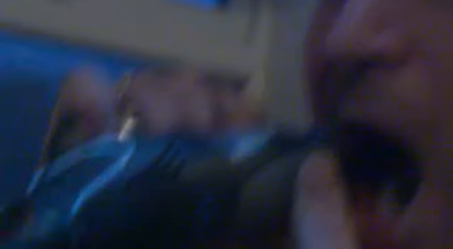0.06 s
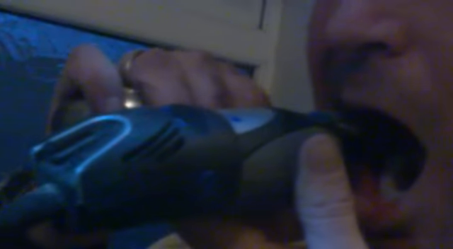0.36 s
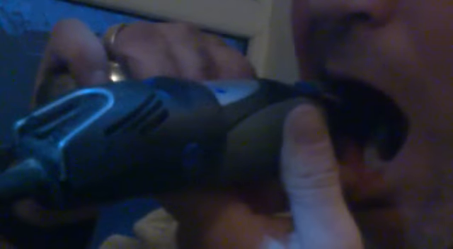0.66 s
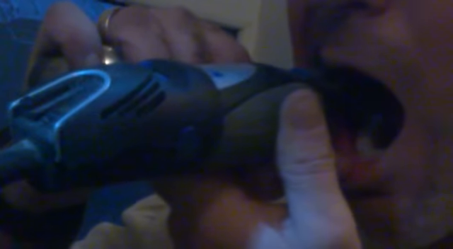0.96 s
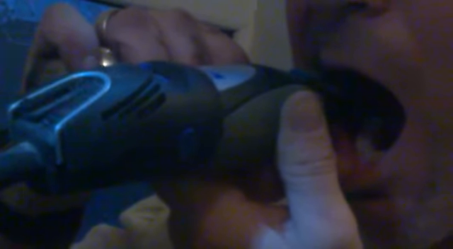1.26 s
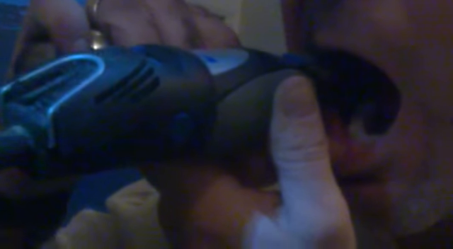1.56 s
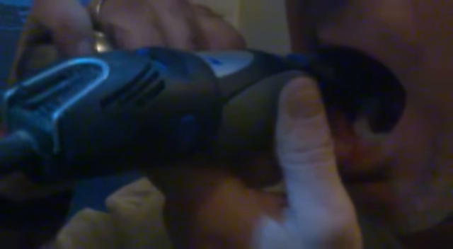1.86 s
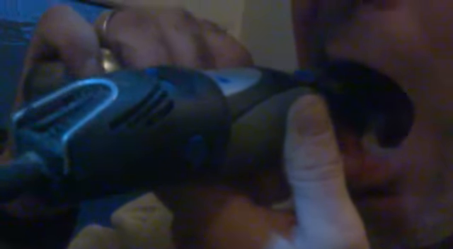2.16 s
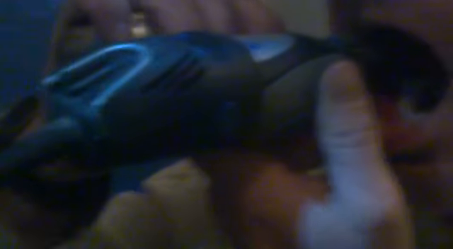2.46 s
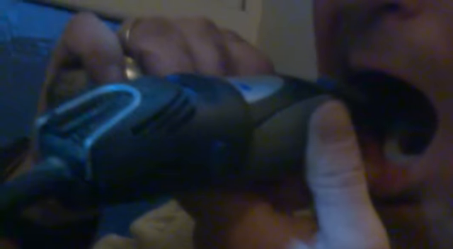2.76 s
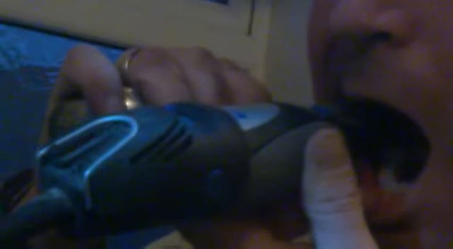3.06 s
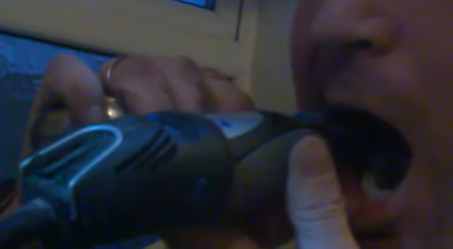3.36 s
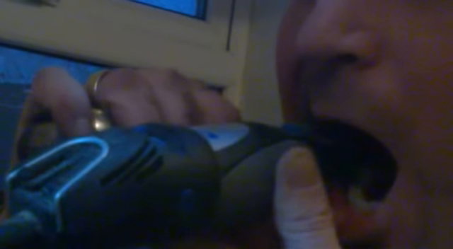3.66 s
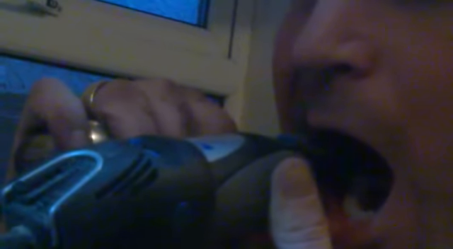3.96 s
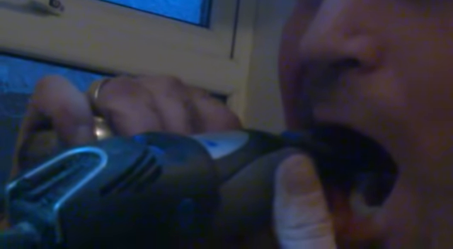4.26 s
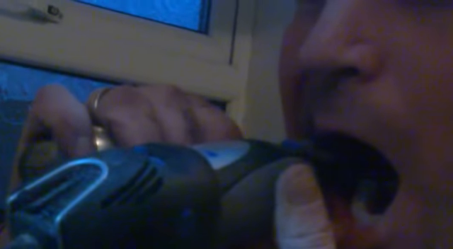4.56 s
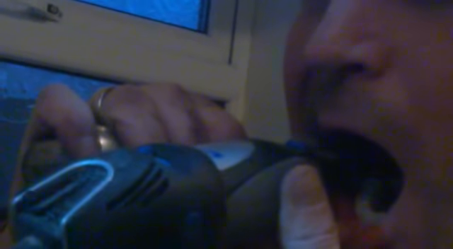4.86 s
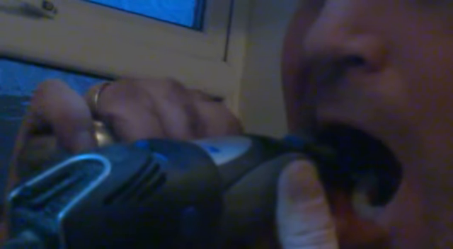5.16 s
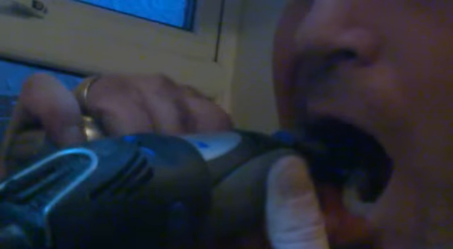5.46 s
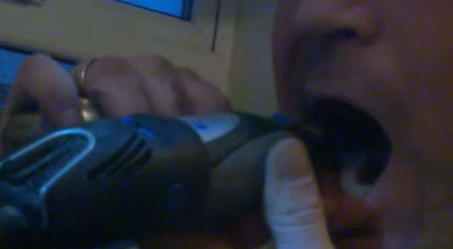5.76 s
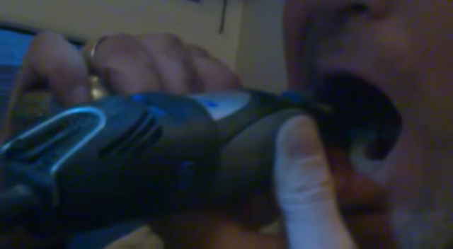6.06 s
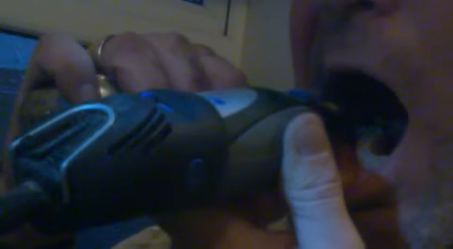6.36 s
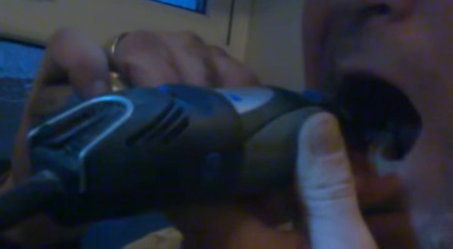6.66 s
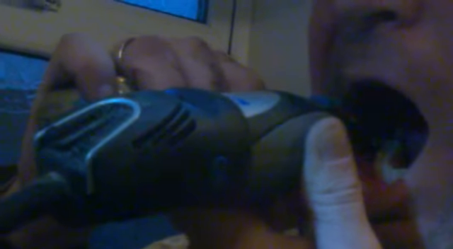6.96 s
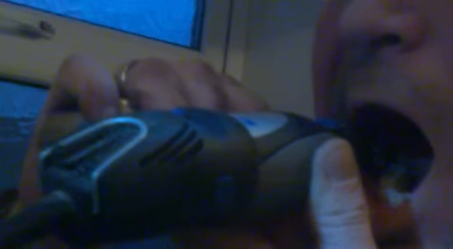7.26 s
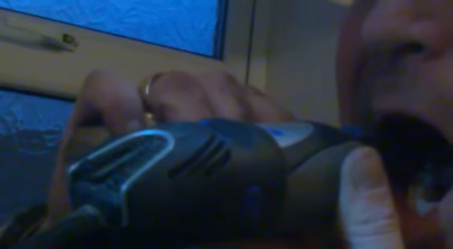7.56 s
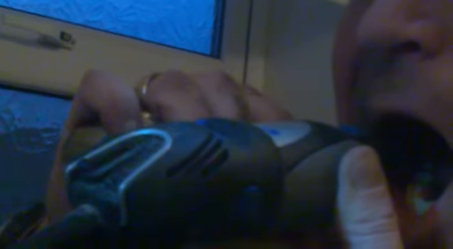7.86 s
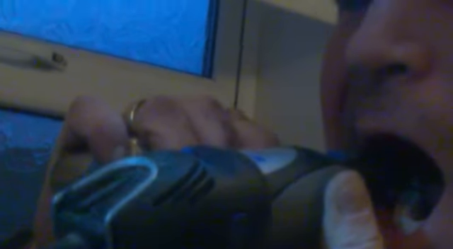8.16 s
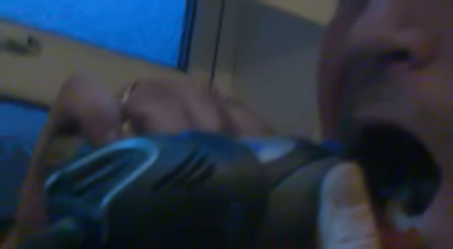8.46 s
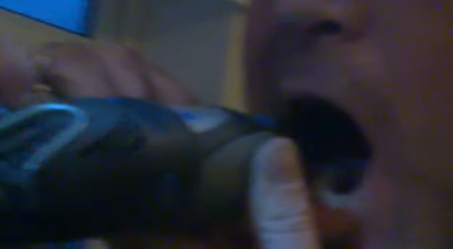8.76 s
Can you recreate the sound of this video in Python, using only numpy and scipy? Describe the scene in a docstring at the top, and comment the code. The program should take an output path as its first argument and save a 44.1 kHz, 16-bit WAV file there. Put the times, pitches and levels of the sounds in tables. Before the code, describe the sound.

Shrill, buzzing scrapes of a spinning burr on a tooth start and stop over a small motor's hum and whine.

```python
"""A mains rotary tool is already running in a small room: hum, commutator whine and cooling air.
In the first second its springy, off-centre burr taps a man's tooth, bouncing and scraping the enamel on
every second turn: a rasping buzz that rings in the burr and the open mouth. Longer stretches follow; in
the gaps only the motor is left. The burr catches hard just after 4 s, goes back to short dabs around 6 s,
then is pushed in again near 8 s, the motor's pitch having crept up all the while."""
import sys
import numpy as np
from scipy import signal
from scipy.fft import rfft, irfft
from scipy.io import wavfile
from scipy.ndimage import uniform_filter1d, map_coordinates

SR = 44100
rng = np.random.default_rng(int(sys.argv[2]) if len(sys.argv) > 2 else 0)


def put_to_file(sound):
    """Save the sound as 16-bit audio at rate SR, in the file named by the first command-line argument."""
    columns = np.atleast_2d(sound).T  # one column per channel
    safe = np.clip(columns, -1, 1)
    whole_steps = np.round(safe * 32767)
    wavfile.write(sys.argv[1], SR, whole_steps.astype(np.int16))


N = 393372
TIME = np.arange(N) / SR


def from_db(db):
    """Decibels to gain."""
    return 10 ** (np.asarray(db) / 20)


def rms_one(x):
    """Scale to unit power."""
    return x / np.sqrt(np.mean(x ** 2) + 1e-20)


def curve(rows):
    """A row-by-row automation curve at every sample."""
    return np.interp(TIME, *np.transpose(rows))


def drift(per_s):
    """Slow random wander of spread 1."""
    knots = rng.standard_normal(4000)
    return rms_one(np.interp(TIME * per_s, np.arange(len(knots)), knots))


def tone(cycles, db, waver_db=1.5):
    """A slightly wavering sine of the given rms level."""
    return np.sqrt(2) * from_db(db + waver_db * drift(16)) * np.sin(2 * np.pi * (cycles + rng.random()))


def resonance(x, hz, width_hz):
    """A steep-sided resonance whose centre may move."""
    carrier = np.exp(2j * np.pi * np.cumsum(hz * np.ones(N)) / SR)
    lowpass = signal.butter(2, width_hz / 2, fs=SR, output="sos")
    return 2 * np.real(carrier * signal.sosfilt(lowpass, x / carrier))


def body(x, modes):
    """Fixed resonances side by side, each passed twice so that the valleys between them stay dark."""
    out = 0
    for hz, width_hz, db in modes:
        edges = np.clip([hz - width_hz / 2, hz + width_hz / 2], 20, .45 * SR)
        band = signal.butter(2, edges, "band", fs=SR, output="sos")
        out = out + from_db(db) * signal.sosfilt(band, signal.sosfilt(band, x))
    return out


def even(x):
    """Hold the power at 1 over a few turns, leaving the single scrapes standing."""
    power = uniform_filter1d(uniform_filter1d(x ** 2, size=1900), size=950)
    return x / np.sqrt(np.maximum(power, 1e-12))


# The tool's pitch. Each row: time in seconds, speed in turns per second.
SPINDLE_SPEED = [(0.0, 174.87), (0.76, 178.2), (1.19, 178.14), (1.49, 178.9), (1.79, 178.26),
                 (2.96, 184.12), (3.13, 183.4), (3.28, 185.25), (4.52, 183.45), (4.54, 184.92),
                 (6.02, 188.29), (7.05, 192.1), (7.3, 194.38), (7.59, 192.65), (7.68, 192.34),
                 (8.48, 193.84), (8.49, 194.85), (8.9, 195.96)]


def spindle_turns():
    """Turns made so far: the spindle creeps up as the motor warms and sags under load."""
    return np.cumsum(curve(SPINDLE_SPEED)) / SR


# The hum's fader. Each row: time in seconds, level in dB.
HUM_LEVEL = [(0.0, -40.5), (6.09, -43), (7.55, -39.5), (8.05, -45), (8.25, -38.5), (8.35, -44.5),
             (8.85, -39), (8.92, -45)]
MAINS_PULSE_HZ = 100


def mains_hum():
    """The pulsing mains current hums in the motor."""
    return tone(MAINS_PULSE_HZ * TIME, curve(HUM_LEVEL), waver_db=.8)


# The rotor's drone. Each row: time in seconds, base level in dB.
SHAKE_LEVEL = [(0.0, -62.5), (0.99, -51.5), (2.66, -57), (3.45, -46), (3.82, -50.5), (4.27, -47.5),
               (4.6, -49), (4.75, -46.5), (5.44, -49), (7.4, -44), (8.85, -47.5), (8.92, -48)]


def rotor_shake(turns, load):
    """The unbalanced rotor shakes once a turn; pressing on the tooth brings out the octave."""
    db = curve(SHAKE_LEVEL)
    octave_gain = from_db(-9.5) + from_db(0.5) * np.sqrt(load)
    return tone(turns, db + 1) + octave_gain * tone(2 * turns, db - 5)


# The whine's fader. Each row: time in seconds, level in dB.
WHINE_LEVEL = [(0, -37.5), (.5, -42), (1, -33.5), (1.6, -39), (2.2, -43), (2.5, -43), (4.5, -48), (6, -52),
               (8.92, -41)]
# Its partials. Each row: multiple of spindle speed, sideband number, trim in dB.
WHINE_PARTIALS = [(16, -3, -4), (16, -2, -2), (16, -1, -14), (16, 0, -12), (16, 1, -19)]


def commutator_whine(turns):
    """The commutator's high note, split into sidebands by the mains pulses."""
    level_db, mains = curve(WHINE_LEVEL), MAINS_PULSE_HZ * TIME
    return sum(tone(k * turns + side * mains, level_db + db) for k, side, db in WHINE_PARTIALS)


# A thin buzz. Each row: multiple of spindle speed, sideband number, level in dB.
BRUSH_PARTIALS = [(8, -1, -54), (8, 0, -53), (8, 1, -56), (8, 2, -55), (24, 0, -57), (24, 1, -55),
                  (24, 2, -60), (32, 0, -59)]


def brush_buzz(turns):
    """The brushes chatter on the commutator bars, which frays their partials."""
    mains = MAINS_PULSE_HZ * TIME
    return sum(tone(k * turns + side * mains + 0.033 * drift(170), db) for k, side, db in BRUSH_PARTIALS)


# The air's EQ. Each row: frequency in Hz, relative level in dB.
AIR_EQ = [(25, -12), (60, -12.5), (300, -12), (520, -9.5), (750, -7), (1050, -16), (1500, -2.5), (2100, -8),
          (3100, -9), (3800, -10), (4550, -11), (5900, -13), (9500, -24.5), (15000, -25.5)]
# The air's fader. Each row: time in seconds, level in dB.
AIR_LEVEL = [(0, -40.5), (1, -39.5), (3.2, -40), (4.6, -42), (6, -39.5), (6.8, -39.5), (8.92, -40)]


def cooling_air():
    """The fan's rush through the vents, throbbing with the current."""
    hz, db = np.transpose(AIR_EQ)
    shape = from_db(np.interp(np.log(np.fft.rfftfreq(N, 1 / SR) + 1), np.log(hz), db))
    rush = rms_one(irfft(rfft(rng.standard_normal(N)) * shape, N))
    throb = 1 + 0.27 * np.sin(2 * np.pi * MAINS_PULSE_HZ * TIME)
    return from_db(curve(AIR_LEVEL)) * rush * throb


# The hollow note's fader. Each row: time in seconds, level in dB.
HOUSING_LEVEL = [(0.0, -50), (0.17, -63), (0.3, -49), (0.65, -61), (0.79, -36.5), (0.92, -57.5),
                 (1.66, -58.5), (2.43, -57), (2.48, -55.5), (4.2, -46), (4.55, -67), (6.78, -55),
                 (7.03, -45), (8.07, -59), (8.87, -56), (8.92, -48)]


def housing_note():
    """Air noise rings a narrow, hollow resonance of the housing."""
    return from_db(curve(HOUSING_LEVEL)) * even(resonance(rng.standard_normal(N), hz=530, width_hz=7.2))


# Stretches of grinding, each with its own colour; some run straight on as the burr shifts spot.
# Each row: start and end in seconds, base level in dB, front cavity pitch in Hz,
# then trims in dB for mouth, shank and lower squeal.
GRIND_STRETCHES = [ (0.007, 0.079, -20, 1990, 1.5, -2, 2), (0.236, 0.26, -21.5, 2130, -6, 0.5, -2),
                   (0.309, 0.339, -18, 2180, 3, 1.5, -3), (0.381, 0.401, -22.5, 2210, -5, 4.5, 0),
                   (0.598, 0.754, -25, 1990, 1.5, -1, -2), (0.75, 0.797, -19, 1960, 2, -5, -2),
                   (0.839, 0.869, -25, 2090, -2, -3.5, -2), (0.957, 1.541, -26, 2010, -0.5, -6, -2),
                   (1.551, 2.016, -26.5, 1860, 1, -3, -5), (2.018, 2.295, -29, 1950, -0.5, 1, 0),
                   (2.335, 2.413, -27.5, 1910, -6, 0, 1), (2.41, 2.763, -24.5, 1940, 0, -4.5, -0.5),
                   (2.81, 2.886, -23.5, 1900, -2.5, 1.5, 1), (2.902, 3.108, -24.5, 1900, 3.5, -2, 0.5),
                   (3.272, 4.161, -25.5, 1920, 2, -5.5, -2), (4.172, 4.437, -26.5, 1900, 0, -4.5, -1.5),
                   (4.635, 5.158, -25, 1945, 2, -4, -2.5), (5.209, 5.617, -29, 1950, 1, -6, -3.5),
                   (5.612, 5.846, -28, 2070, 2.5, -9, -4), (5.873, 5.886, -26.5, 1980, -8, -11, 5),
                   (6.043, 6.087, -28, 1870, 0, -1.5, -1), (6.121, 6.316, -25.5, 2040, -2.5, -2.5, -2.5),
                   (6.356, 6.377, -29, 2020, -18, -3, 3), (6.465, 6.693, -29, 1930, 1.5, -4.5, -1),
                   (6.831, 6.852, -28, 1960, -3, -5.5, 2), (6.884, 7.076, -25, 1950, 5.5, -2.5, -3),
                   (7.103, 7.249, -24, 1900, 0, -2, -2.5), (7.264, 7.713, -25.5, 1935, 2, -3, 3),
                   (7.695, 7.899, -26.5, 2190, 1.5, -4, 1), (7.921, 7.96, -26, 2030, 0, 2, 2.5),
                   (8.025, 8.442, -29, 1974, -0.5, -1.5, 1), (8.516, 8.706, -25, 2110, 4.5, -2.5, -0.5),
                   (8.69, 8.95, -23, 1900, -2.5, -1, 2)]


def latest_stretch():
    """The row of the stretch that started last, as columns at every sample."""
    rows = np.array(GRIND_STRETCHES)
    return rows[np.maximum(np.searchsorted(rows[:, 0], TIME, side="right") - 1, 0)].T


# Swells: the hand leans in or eases off. Each row: centre and half length in seconds, boost in dB.
HAND_PUSHES = [(1.047, 0.073, 9), (1.385, 0.061, 4), (1.66, 0.13, 6.5), (1.802, 0.031, 4), (2.0, 0.027, 3),
               (2.16, 0.11, 6), (3.025, 0.073, 4.5), (3.451, 0.075, 9.5), (4.013, .035, 3.5),
               (4.313, 0.11, 8), (4.874, 0.02, -7), (4.998, .076, 5), (5.223, 0.033, -4), (5.31, .035, 10),
               (5.44, 0.093, 9.5), (5.785, 0.11, 6), (6.135, 0.072, 8), (6.61, 0.078, 3.5),
               (7.473, 0.14, 8), (7.837, 0.046, 16), (8.124, 0.16, 10.5), (8.257, 0.1, 5)]
# Accents: the burr digs in abruptly, then eases. Each row: time in seconds, boost in dB.
BURR_CATCHES = [(.044, 0.5), (0.685, 13.5), (1.305, 5.5), (1.452, 7.5), (1.553, 5.5), (2.424, 7.5),
                (2.915, 7), (3.76, 9), (3.845, 4.5), (4.174, 15), (4.193, 18), (4.28, 11), (5.414, 1),
                (5.803, 5), (6.163, -1), (6.642, 6), (7.105, 5.5), (7.196, 7.5), (7.388, 4), (7.606, 11),
                (7.766, 10), (8.232, 2)]
CATCH_S, EASE_S = 0.0015, 0.019
DIP_DB, DIP_IN_S, DIP_OUT_S = 3, 0.012, 0.027   # the level dips at both ends of a stretch
ATTACK_S, RELEASE_S = 0.002, 0.0099
TREMOR_DB, USUAL_DB = 1.64, -24
HARDEST_DB, YIELD_DB = -13.5, 2   # the springy shank gives way, which caps the scraping force


def hand_pressure():
    """How hard the unsteady hand bears on the tooth (dB), and the gate of the grinding (0-1)."""
    start, end, db = latest_stretch()[:3]
    db = db - DIP_DB * np.exp(-np.maximum(TIME - start, 0) / DIP_IN_S)
    db -= DIP_DB * np.exp(-np.maximum(end - TIME, 0) / DIP_OUT_S)
    for s, half_s, boost_db in HAND_PUSHES:
        db += boost_db * np.exp(-((TIME - s) / half_s) ** 2)
    for s, boost_db in BURR_CATCHES:
        db += boost_db * np.clip((TIME - s) / CATCH_S + 1, 0, 1) * np.exp(-((TIME - s) / EASE_S) ** 2)
    db += TREMOR_DB * drift(per_s=35)
    db -= YIELD_DB * np.logaddexp(0, (db - HARDEST_DB) / YIELD_DB)
    gate = np.clip((TIME - start) / ATTACK_S, 0, 1) * np.exp(-np.maximum(TIME - end, 0) / RELEASE_S)
    return db, uniform_filter1d(gate, size=130)


# Skids, where the buzz jumps an octave. Each row: centre and half length in seconds.
BURR_SKIDS = [(2.002, 0.039), (2.406, 0.015), (4.26, 0.013), (7.93, .012)]


def bounce(turn, rebound_db=-78, settle_s=0.0049):
    """How firmly each turn lands: every second one, but all of them as a stretch starts and in a skid."""
    start = latest_stretch()[0]
    first_turn = turn[np.clip(start * SR, 0, N - 1).astype(int)]
    firm = (turn - first_turn) % 2 == 0
    settling = np.exp(-((TIME - start) / settle_s) ** 2)
    skidding = sum(np.exp(-((TIME - s) / half_s) ** 2) for s, half_s in BURR_SKIDS)
    graze = from_db(rebound_db + 3 * rng.standard_normal(2048))[turn]
    return np.maximum.reduce([firm, settling, skidding, graze])


def scrapes(turns, arc_turns=0.19, knock_turns=.02, wear_per_s=17):
    """The burr's high side drags over the enamel for a small arc: the force, and the knock within it."""
    high_side = turns - .2   # it meets the tooth at a fixed angle of the spindle
    turn = np.floor(high_side).astype(int)
    strength, lateness = rng.standard_normal((2048, 2))[turn].T
    angle = high_side % 1 - .5 + 0.0027 * lateness
    # the same cutting edges come round each turn; their bite changes as the burr moves over the tooth
    edges = rng.standard_normal((400, 240))
    place = [TIME * wear_per_s, (angle + .5) * edges.shape[1]]
    bite = map_coordinates(edges, place, order=1, mode="wrap") + 0.34 * rng.standard_normal(N)
    firm = from_db(0.16 * strength) * bounce(turn)
    touch = np.exp(-np.abs(angle / arc_turns) ** 3)
    knock = np.exp(-((angle + arc_turns / 2) / knock_turns) ** 2)
    dust = from_db(-23.5) * rng.standard_normal(N)   # keeps rubbing between the scrapes
    return bite * firm * touch + dust, np.sqrt(firm) * knock


def layer(x, push_db, db, loss):
    """One colour at a slightly wandering level, `loss` dB down per dB of push."""
    return from_db(db - loss * push_db + 0.7 * drift(per_s=9)) * even(x)


# The metal's colours, dark to bright. Each row: centre in Hz, width in Hz, relative level in dB.
SHANK_MODES = [(2806, 650, -7.5), (3230, 538, 1)]
LOWER_SQUEAL_MODES = [(4422, 1060, 0)]
SQUEAL_MODES = [(5742, 936, 0)]
GRIT_MODES = [(7707, 1840, 0), (9810, 290, -11.5), (11245, 1320, -7.5)]


def burr_ring(force, push_db, shank_db, lower_db):
    """Scrapes ring in burr and shank; a harder push feeds mostly the main squeal."""
    ring = from_db(-1.54) * even(body(force, SQUEAL_MODES))
    ring += layer(body(force, LOWER_SQUEAL_MODES), push_db, db=lower_db - 6, loss=0.12)
    ring += layer(body(force, SHANK_MODES), push_db, db=shank_db - 1.15, loss=0.63)
    return ring + layer(body(force, GRIT_MODES), push_db, db=-9, loss=0.13)


# The mouth's vowel colour. Each row: centre in Hz, width in Hz, relative level in dB.
PALATE_MODES = [(1644, 1240, -16)]
THROAT_MODES = [(850, 230, 0)]
# The throat's fader. Each row: time in seconds, trim in dB.
THROAT_TRIM = [(0, 2), (1.1, 0.5), (1.85, 4), (2.5, 0), (3.5, -2), (4.3, 0), (5.1, 2.5), (6.3, -0.5),
               (7.6, -3), (8.92, -1)]
CAVITY_SPLIT, CAVITY_WANDER = 0.078, 0.019   # fractions of the front cavity's pitch


def open_mouth(force, knock, push_db, cavity_hz, mouth_db):
    """Knock and scrape resound in palate, throat and the front cavity's two close resonances."""
    cavity_hz = cavity_hz * (1 + CAVITY_WANDER * drift(per_s=6))   # jaw and tongue never hold quite still
    mouth = body(force, PALATE_MODES)
    for side in (-1, 1):
        hz = cavity_hz * (1 + side * CAVITY_SPLIT)
        mouth += from_db(0.53 * side) * resonance(knock + .5 * force, hz, width_hz=320)
    throat = body(knock + 0.54 * force, THROAT_MODES)
    throat_db = .5 * mouth_db + curve(THROAT_TRIM) - 17
    return layer(mouth, push_db, mouth_db - 9.5, loss=0.26) + layer(throat, push_db, throat_db, loss=0.23)


# The fizz on top. Each row: centre in Hz, width in Hz, relative level in dB.
FIZZ_BAND = [(13650, 3400, 0)]


def overload_fizz(force, push_db):
    """A high fizz of overload distortion, played as a treble band that flares on the loudest scrapes."""
    return layer(body(force, FIZZ_BAND), push_db, db=-29.5, loss=-0.43)


def grinding(turns, press_db, gate):
    """The whole rasp: ringing metal, fizz, open mouth, a little bare scrape and the tool's rocking."""
    cavity_hz, mouth_db, shank_db, lower_db = uniform_filter1d(latest_stretch()[3:], size=900, axis=1)
    force, knock = scrapes(turns)
    push_db = press_db - USUAL_DB
    metal = burr_ring(force, push_db, shank_db, lower_db)
    fizz = overload_fizz(force, push_db)
    mouth = open_mouth(force, knock, push_db, cavity_hz, mouth_db)
    bare = from_db(-11.5) * even(body(force, [(3910, 4800, 0)]))
    # bouncing on every second turn rocks the tool at one and a half times the spindle speed
    rocking = from_db(-32) * np.sin(3 * np.pi * turns)
    return from_db(press_db) * gate * (metal + fizz + mouth + bare + rocking)


def room(x, t60_s, wet_db, dull_hz):
    """Dense reflections from the walls, weaker in the treble."""
    t = np.arange(SR // 2) / SR
    tail = rng.standard_normal(len(t)) * from_db(-60 * t / t60_s) * (t > .003)
    tail = signal.sosfilt(signal.butter(1, dull_hz, fs=SR, output="sos"), tail / np.linalg.norm(tail))
    return x + from_db(wet_db) * signal.fftconvolve(x, tail)[:N]


def scene():
    """One spindle drives both the grinding and the motor's tones; the hand's pressure colours both."""
    turns = spindle_turns()
    press_db, gate = hand_pressure()
    load = from_db(press_db - USUAL_DB) * np.maximum(gate, 0)
    rasp = room(grinding(turns, press_db, gate), t60_s=0.11, wet_db=-2.5, dull_hz=3000)
    rasp = room(rasp, t60_s=0.67, wet_db=-18, dull_hz=4000)   # the far walls ring on faintly
    motor = mains_hum() + rotor_shake(turns, load) + commutator_whine(turns) + brush_buzz(turns)
    return (motor + cooling_air() + housing_note() + rasp)[None]


def record(dry, cutoff_hz=15800):
    """The loudest peaks are rounded and the top is cut."""
    rounded = dry / (1 + (dry / .8) ** 8) ** (1 / 8)
    return signal.sosfilt(signal.ellip(10, .1, 80, cutoff_hz, fs=SR, output="sos"), rounded)


dry = scene()
out = record(dry)
put_to_file(out)
```